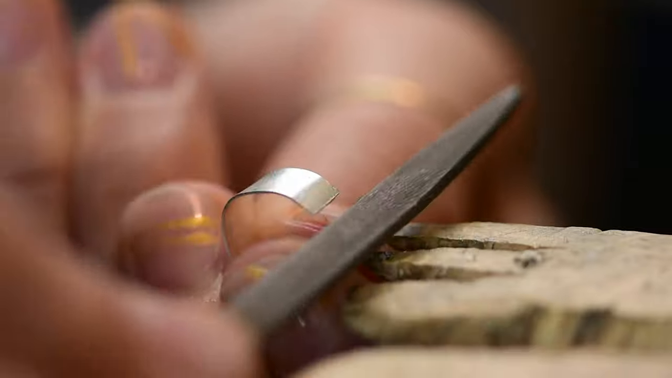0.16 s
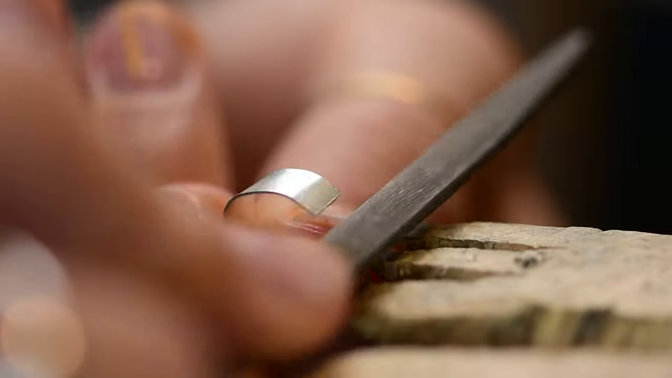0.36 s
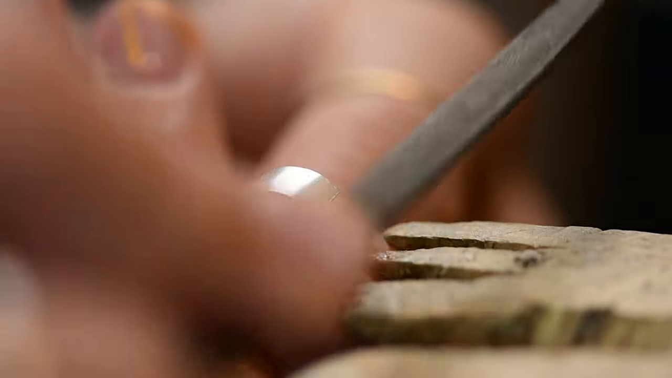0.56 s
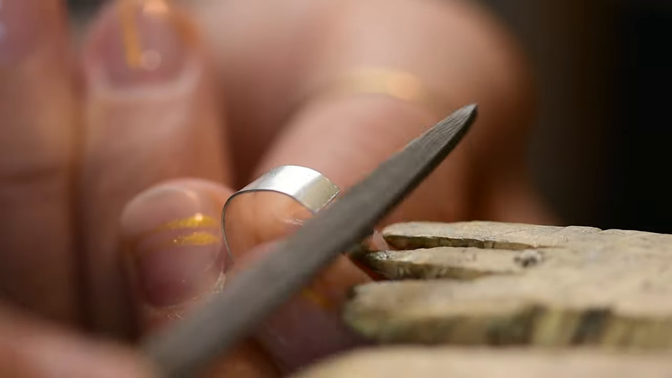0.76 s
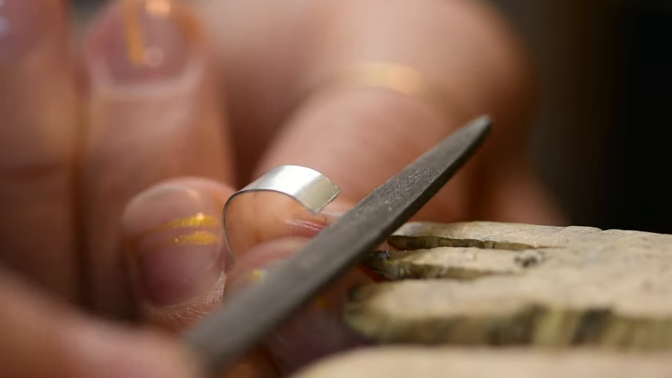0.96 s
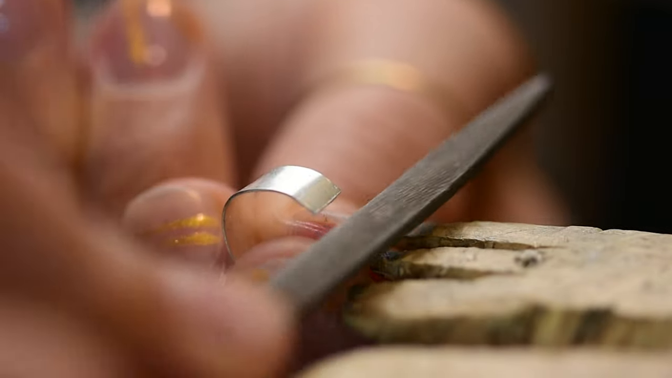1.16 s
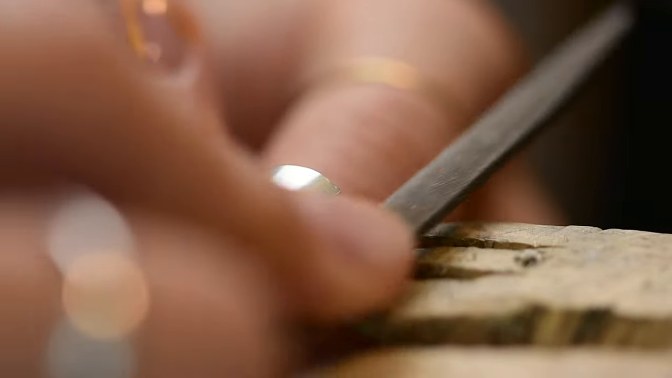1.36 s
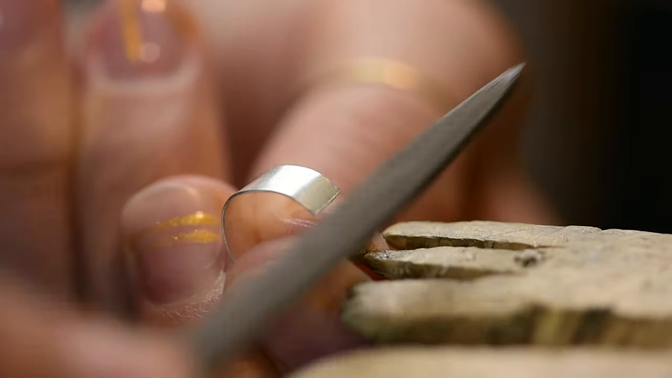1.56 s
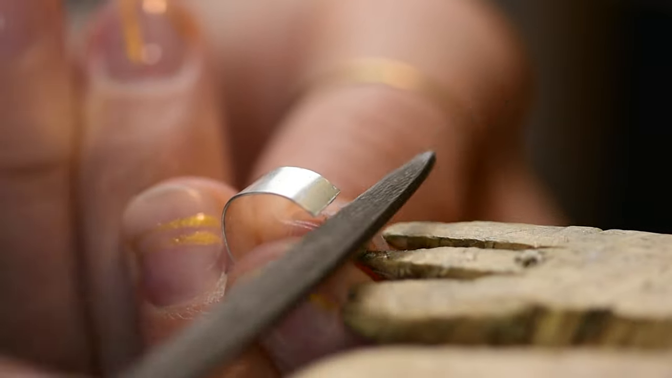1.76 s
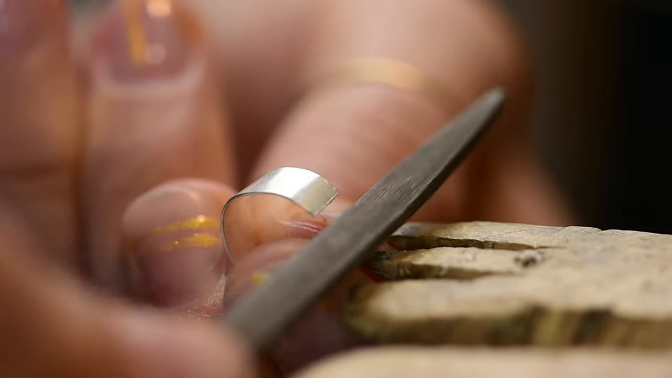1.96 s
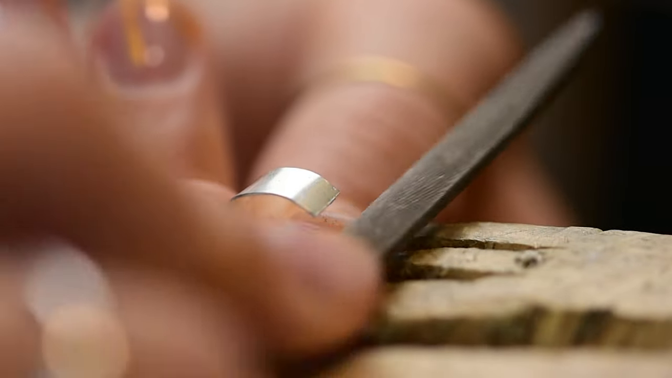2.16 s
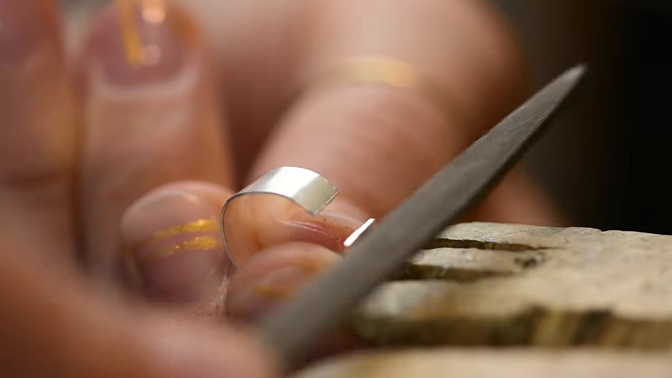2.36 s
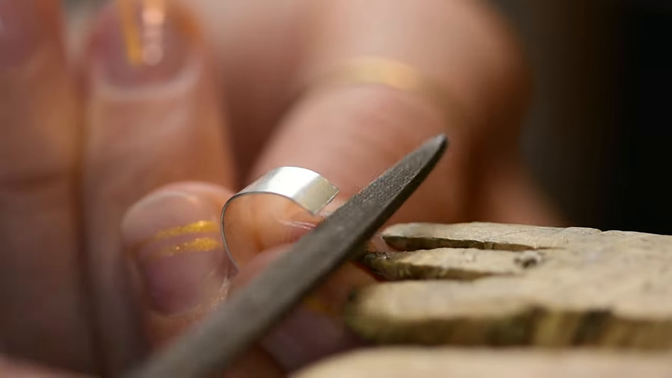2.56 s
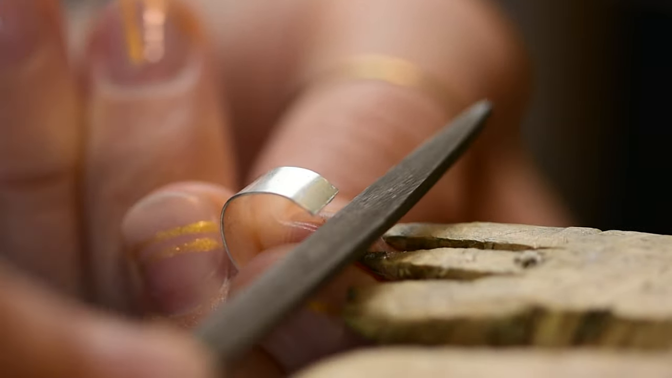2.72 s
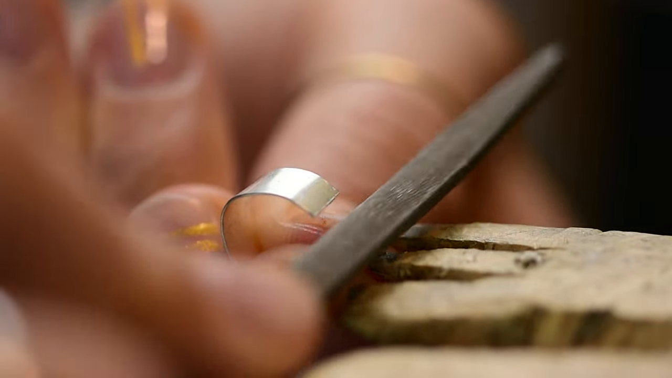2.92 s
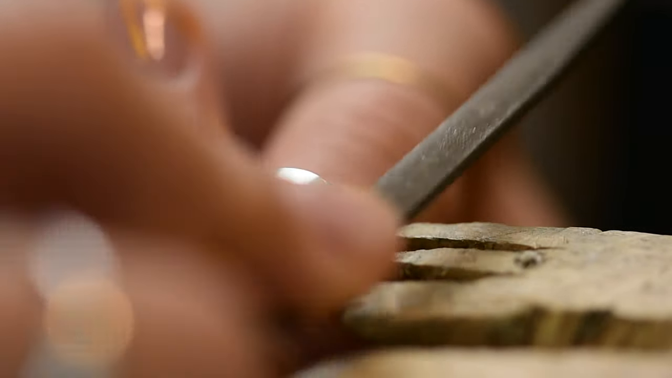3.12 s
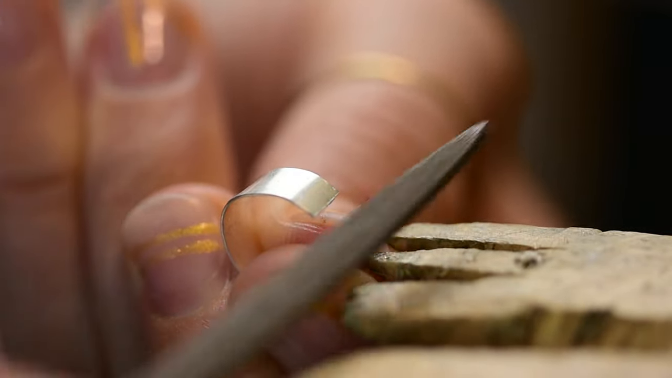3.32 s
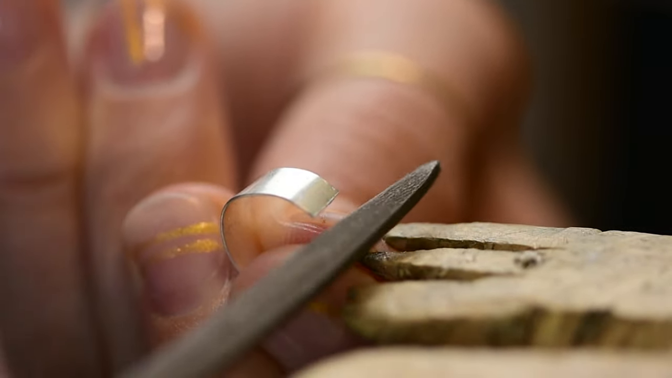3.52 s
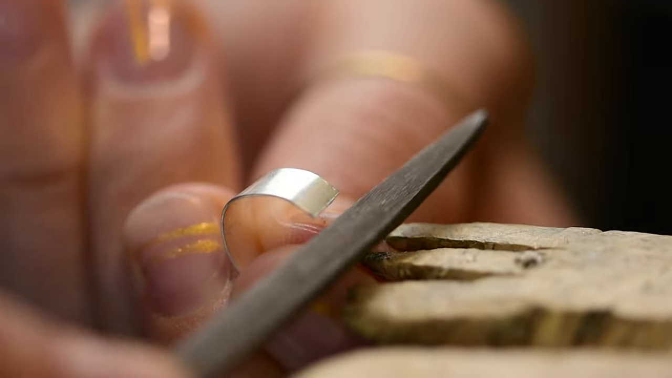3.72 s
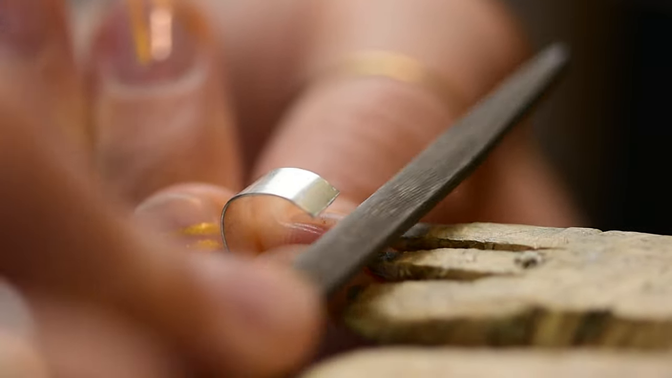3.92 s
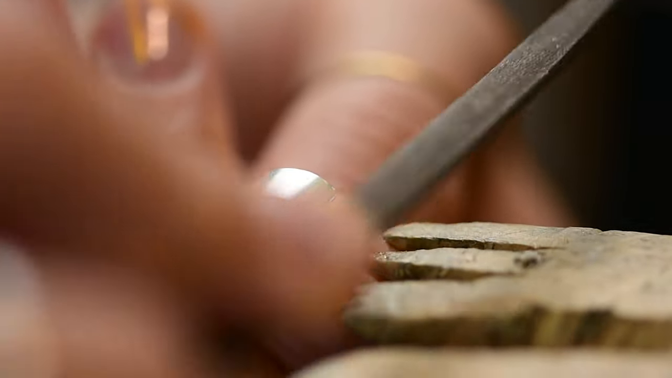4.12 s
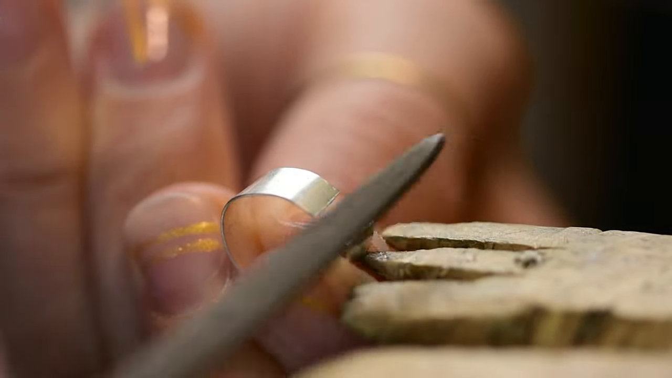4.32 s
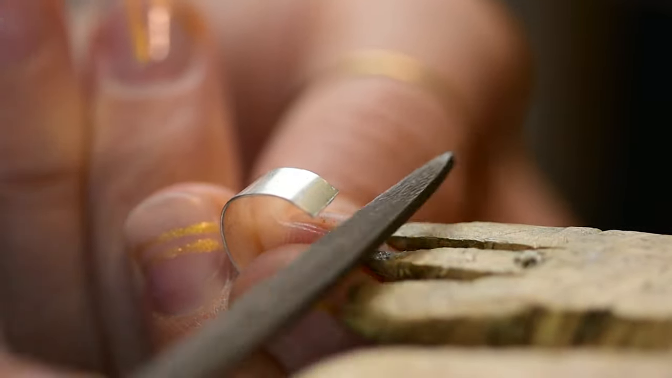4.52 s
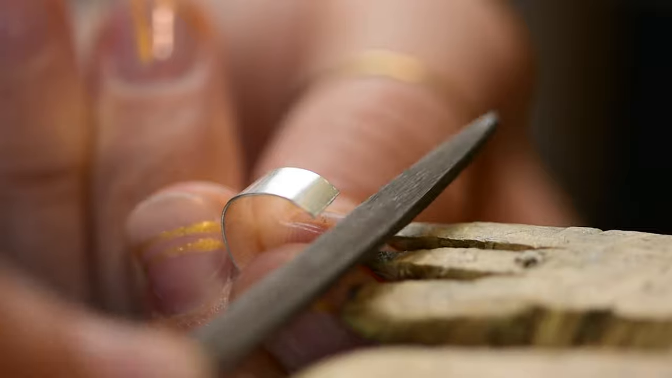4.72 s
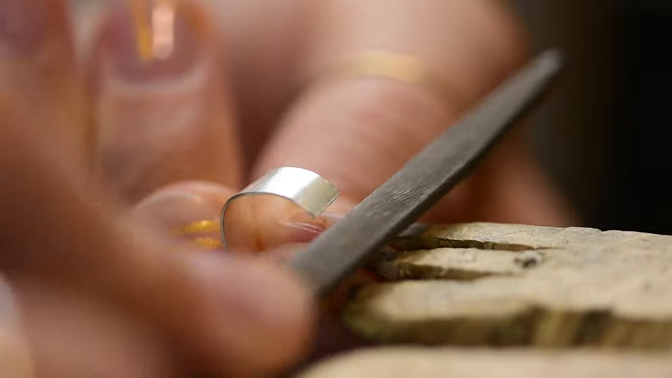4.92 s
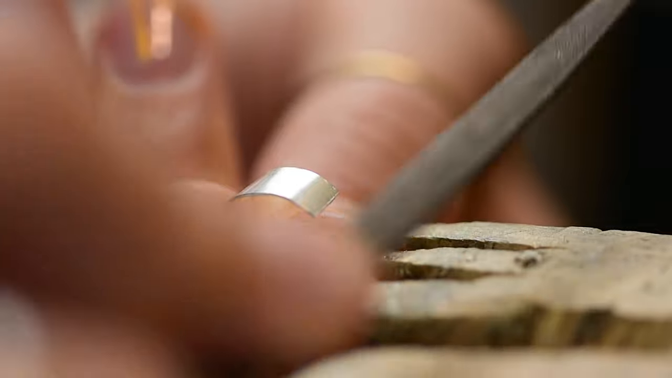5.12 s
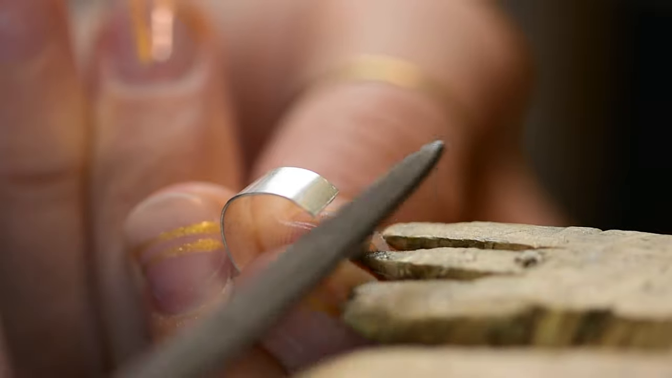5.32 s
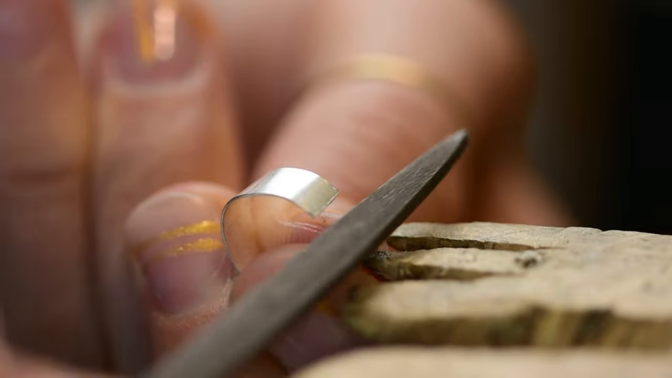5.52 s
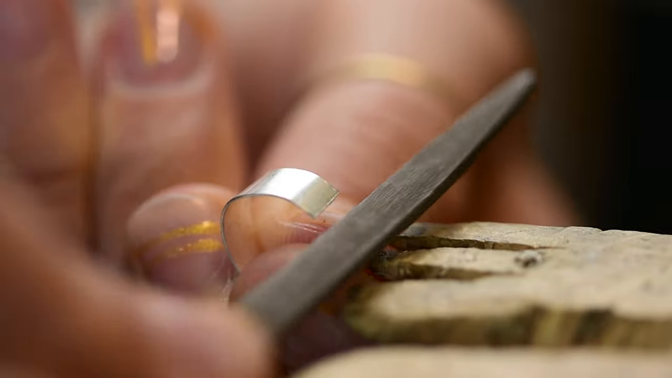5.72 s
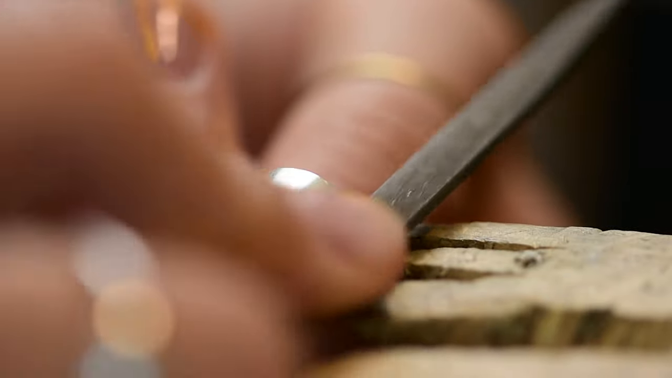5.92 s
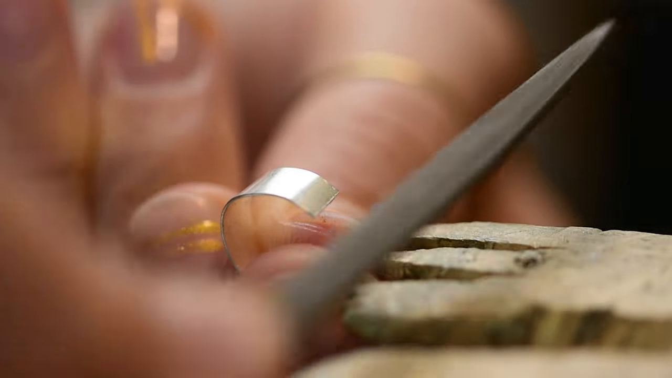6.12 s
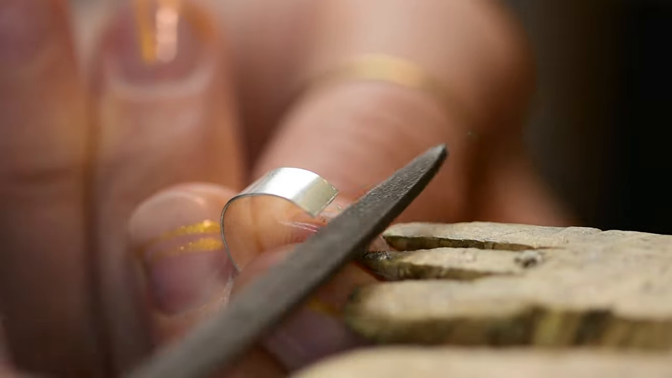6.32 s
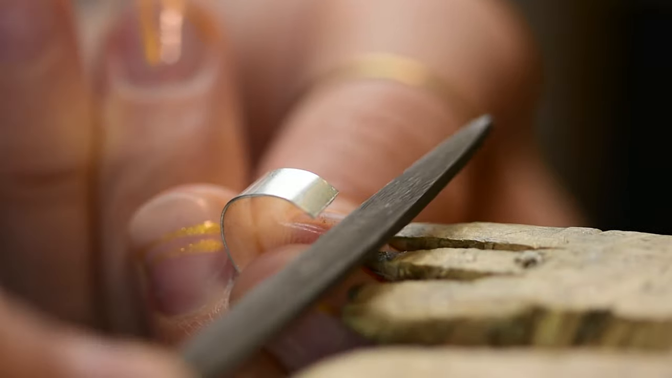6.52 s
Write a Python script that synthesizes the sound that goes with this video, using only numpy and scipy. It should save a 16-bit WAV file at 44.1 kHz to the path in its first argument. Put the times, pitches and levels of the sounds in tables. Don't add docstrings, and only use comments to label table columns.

```python
import sys
import numpy as np
from scipy import signal
from scipy.fft import rfft, irfft, next_fast_len
from scipy.io import wavfile
from scipy.ndimage import uniform_filter1d, map_coordinates

SR = 44100
rng = np.random.default_rng(int(sys.argv[2]) if len(sys.argv) > 2 else 0)


def pcm_store(signal):
    levels = np.round(np.clip(np.atleast_2d(signal), -1, 1) * 32767)
    wavfile.write(sys.argv[1], SR, levels.astype(np.int16).T)


def ratio_of_db(decibels):
    return 10 ** (np.asarray(decibels, float) / 20)


N = 294588
T = np.arange(N) / SR

# frequency in Hz, density in dB per Hz.
RUMBLE_SPECTRUM = [(12, -57), (20, -3), (65, 11), (90, -3), (120, -66), (200, -120)]
BUMP_SPECTRUM = [(12, -12), (27, 0), (45, -14), (80, -40), (150, -120)]
# frequency in Hz, density in dB per Hz.
AIR_SPECTRUM = [(53, -13), (90, -2.5), (117, -2.5), (153, -10.5), (390, -14), (539, -24.5), (662, -19.5),
                (3000, -38), (3900, -74), (6600, -120)]
HISS_SPECTRUM = [(1500, -32), (2500, -10.5), (4500, -3.5), (4700, 0.5), (8900, -8.5), (9100, 0.5),
                 (13000, -6), (13200, -1), (15800, -3)]
# frequency in Hz, level in dB.
WHINE_LINES = [(4877, -93), (5626, -94), (6751, -93), (7127, -90), (9372, -96), (13501, -94), (13878, -92),
               (14250, -86), (14626, -92)]
# frequency in Hz, decay by 60 dB in seconds.
ROOM_DECAY = [(200, 0.39), (1000, 0.34), (4000, 0.17), (14000, 0.14)]
# frequency in Hz, width in Hz.
WORK_DIPS = [(1620, 110), (3920, 160), (4800, 200), (6800, 110)]

ROCK_HZ = [170, 208, 285, 308, 533]
PIN_HZ = [342, 371, 398, 430]
BENCH_HZ = [590, 666, 700, 764, 831, 887, 984, 1048]
FILE_HZ = [1260, 1390, 1517, 1770, 1830, 1965, 2185, 2600, 2810, 3120, 3375, 3620, 4200, 4500, 5300, 5600,
           5980, 6478, 6940, 7300, 7770, 8510]
# width in Hz, level in dB.
ROCK_SHAPES = [(40, -21), (20, -7), (22, -3), (14, 3), (20, -7)]
PIN_SHAPES = [(22, -9), (16, 0), (22, -5), (28, -11)]
BENCH_SHAPES = [(50, -3), (46, 6.5), (38.3, 7.5), (28, 7.5), (29.5, 2), (23.5, 4), (33.6, 2), (44, -1)]
FILE_SHAPES = [(254, -3.5), (60.5, 3), (66, 1), (64, 2), (46, -11.5), (77, -1.5), (54, -3), (157, -6.5),
               (88, -5.5), (101, -2.5), (93, -16.5), (97, -5.5), (212, -7), (141, -5.5), (480, -11.5),
               (198, -11), (160, -11), (169, -17.5), (151, -10.5), (120, -15), (141, -12.5), (260, -27.5)]
# frequency in Hz, width in Hz, level in dB.
TIP_MODES = [(1830, 80, 0), (6478, 160, -4), (3375, 100, -5), (8510, 140, -13)]
CHIP_MODES = [(9370, 260, -3), (10660, 770, -2), (12100, 1260, -1.5), (12920, 1360, 2), (14200, 1500, -8),
              (16150, 320, 1)]

# start in seconds, level in dB.
TICKS = [(.5135, -30), (.8834, -44), (2.252, -42), (4.4825, -28), (4.584, -50)]
# start in seconds, peak in dB, bench knock in dB over the peak,
# low clank in dB over the peak.
TAPS = [(0.0164, -49.5, 11, -1), (0.884, -24, -2, 14), (2.6114, -68, 18, -7), (3.5159, -43, 3.5, 10),
        (4.4839, -30.5, -5.5, -30), (4.5831, -33, -33, -14), (5.5004, -49, 2, -10), (6.3879, -47, 2, 12)]
# time in seconds, bite in dB.
BITE = [
    [(0.02, -56.5), (0.102, -52.5), (0.17, -56), (0.366, -44), (0.392, -51), (0.418, -43.5), (0.519, -51.5)],
    [(0.93, -62.5), (0.97, -76), (0.98, -62), (1.206, -44), (1.212, -48.5), (1.374, -39.5), (1.418, -48.5)],
    [(1.77, -72.5), (1.89, -49), (1.954, -53), (1.964, -35), (1.972, -45), (2.202, -41), (2.26, -52)],
    [(2.6, -90.5), (2.708, -54), (2.714, -54.5), (2.85, -47), (2.862, -54), (3.082, -39), (3.119, -51.5)],
    [(3.55, -74.5), (3.63, -56.5), (3.742, -59), (3.79, -44), (3.81, -47.5), (4.066, -44), (4.11, -60)],
    [(4.53, -63.5), (4.578, -74), (4.584, -58), (4.652, -72), (4.722, -52.5), (5.062, -40.5),
     (5.092, -53.5)],
    [(5.49, -80), (5.508, -65.5), (5.672, -47.5), (5.85, -42), (5.88, -39), (6.002, -43), (6.01, -48)],
    [(6.42, -70), (6.464, -66), (6.488, -57), (6.514, -61.5), (6.598, -46), (6.604, -51), (6.68, -45.5)],
]
# time in seconds, weight in dB.
WEIGHT = [
    [(0.02, -54), (0.35, -36.5), (0.412, -42), (0.434, -34.5), (0.512, -35.5), (0.519, -46.5)],
    [(0.93, -52.5), (1.038, -41), (1.25, -39), (1.306, -28.5), (1.392, -34.5), (1.418, -48)],
    [(1.77, -60), (1.836, -48), (1.978, -38.5), (2.144, -35.5), (2.214, -32), (2.26, -44)],
    [(2.6, -87), (2.616, -65), (2.802, -43), (2.956, -38), (3.002, -33), (3.119, -37.5)],
    [(3.55, -56.5), (3.808, -40.5), (3.874, -46), (3.926, -31), (4.066, -38), (4.11, -42.5)],
    [(4.53, -52.5), (4.656, -52), (4.702, -45), (4.822, -35), (5.062, -35.5), (5.092, -43)],
    [(5.49, -90), (5.518, -54.5), (5.758, -31), (5.782, -40), (5.916, -26.5), (6.01, -32)],
    [(6.42, -59), (6.466, -49), (6.486, -46.5), (6.57, -43), (6.586, -37), (6.68, -34.5)],
]
# time in seconds, lean of the hand just before in dB.
LIFTS = [(0.517, 5), (1.418, 9.5), (2.262, 6), (3.117, -2.5), (4.11, 5.5), (5.092, 3), (6.008, -7),
         (6.9, -1)]
# middle in seconds, half length in seconds, bite in dB.
GRAZES = [(1.64, 0.24, -60.5), (2.425, 0.22, -59.5), (4.3, 0.022, -66)]
# time in seconds, peak in dB.
CATCHES = [(0.0732, -41), (0.2374, -38), (0.411, -33), (0.5132, -32), (0.9767, -47), (1.043, -42),
           (1.0819, -38), (1.1318, -35), (1.1974, -36), (1.2814, -32), (1.8911, -37), (1.9634, -26),
           (2.0333, -31), (2.0792, -30), (2.2503, -34), (2.7132, -40), (2.8429, -39), (2.8953, -37),
           (3.0081, -29), (3.5927, -47), (3.7095, -44), (3.7539, -39), (3.9744, -36), (4.7152, -40),
           (4.8, -37), (4.9751, -35), (5.5294, -49), (5.7194, -35), (5.8975, -27), (6.4757, -45)]

TOUCH_S, LIFT_S, SETTLE_S = 0.03, 0.008, 0.2


def unit(x):
    return x / np.sqrt(np.mean(x ** 2) + 1e-20)


def decay(t, t60):
    return ratio_of_db(-60 * t / t60)


def along(points, hz):
    f, v = np.transpose(points)
    return np.interp(np.log(hz + 1), np.log(f + 1), v)


def wobble(rate):
    knots = rng.standard_normal(int(N * rate / SR) + 4)
    return map_coordinates(knots, [T * rate])


def filtered(x, response):
    m = next_fast_len(N + SR // 2)
    return irfft(rfft(x, m) * response(np.fft.rfftfreq(m, 1 / SR)), m)[:N]


def noise(spectrum):
    return unit(filtered(rng.standard_normal(N), lambda hz: ratio_of_db(along(spectrum, hz))))


def rumble():
    start_db, grows_db_per_s, sway_db = -70.5, 0.88, -1.5
    ground = ratio_of_db(start_db + grows_db_per_s * T + sway_db * wobble(4)) * noise(RUMBLE_SPECTRUM)
    bump_s, bump_db, rise_s, fall_s = 1.03, -52, 0.12, 0.2
    bump = ratio_of_db(bump_db - 15 * np.maximum((bump_s - T) / rise_s, (T - bump_s) / fall_s))
    return ground + bump * noise(BUMP_SPECTRUM)


def air(swell_db):
    breath = ratio_of_db(-61.2 + 0.3 * swell_db + 0.88 * wobble(1.76))
    return breath * noise(AIR_SPECTRUM) + ratio_of_db(-71.5) * noise(HISS_SPECTRUM)


def hum(swell_db):
    level_db, wander_rad = -58.7, 1.25 * 0.13
    phase = 2 * np.pi * 100 * T + wander_rad * wobble(13)
    return ratio_of_db(level_db + swell_db + 1.34 * wobble(6)) * np.sin(phase)


def whine():
    return sum(ratio_of_db(db + 3) * np.sin(2 * np.pi * hz * T) for hz, db in WHINE_LINES)


def background():
    middle_s, peak_db, half_width_s = 6, 4.5, 0.7
    swell_db = peak_db * np.exp(-((T - middle_s) / half_width_s) ** 2)
    return rumble() + air(swell_db) + hum(swell_db) + whine()


def room(x):
    hz, t, z = signal.stft(rng.standard_normal(SR // 2), SR, nperseg=256)
    t60 = along(ROOM_DECAY, hz)[:, None]
    tail = signal.istft(z * decay(t, t60), SR, nperseg=256)[1]
    return signal.fftconvolve(np.pad(x, (200, 0)), tail / np.linalg.norm(tail))[:N]


def dipped(f):
    dips = [(c * c - f * f + 0.2j * f * w) / (c * c - f * f + 1j * f * w) for c, w in WORK_DIPS]
    return np.prod(dips, axis=0)


def body(modes, sign=-1):
    def shape(f):
        return sum(sign ** k * ratio_of_db(db) * 1j * f * w / (c * c - f * f + 1j * f * w)
                   for k, (c, w, db) in enumerate(modes))

    norm = np.sqrt(np.mean(np.abs(shape(np.linspace(0, SR / 2, num=8192))) ** 2))
    return lambda f: shape(f) / norm


def modes(hz, shapes, sign=-1):
    return body(np.column_stack([hz, shapes]), sign)


def ticks():
    t = np.arange(SR // 10) / SR
    edge = np.zeros(N + SR)
    for s, db in TICKS:
        burst = (decay(t, 0.004) + 0.015 * decay(t, 0.1)) * rng.standard_normal(len(t))
        edge[round(s * SR):][:len(t)] += ratio_of_db(db + 5) * (burst + 2 * (t == 0))
    bright = body([(13300, 7000, 0)])
    return filtered(edge[:N], lambda f: bright(f) ** 2 / 2)


def taps():
    t = np.arange(SR // 8) / SR
    knock, clank, ring = np.zeros((3, N + SR))
    for s, db, knock_db, clank_db in TAPS:
        at = slice(round(s * SR), round(s * SR) + len(t))
        rattle = rng.standard_normal((3, len(t)))
        thump = 4 * decay(t, 0.0007) + (0.5 * decay(t, 0.03) + 0.3 * decay(t, 0.33)) * rattle[0]
        knock[at] += ratio_of_db(db + knock_db + 4) * thump
        clank[at] += ratio_of_db(db + clank_db - 19.5) * (5 * (t == 0) + 0.71 * decay(t, 0.051) * rattle[1])
        ring[at] += ratio_of_db(db - 12) * (6 * (t == 0) + (decay(t, 0.018) + 0.23 * decay(t, 0.18)) * rattle[2])
    soft = filtered(knock[:N], body([(830, 380, 0)])) / 8
    wood = filtered(soft, modes(BENCH_HZ, BENCH_SHAPES, 0.61))
    wood += 0.15 * filtered(soft, modes(PIN_HZ, PIN_SHAPES))
    low_steel = filtered(clank[:N], modes(FILE_HZ[:7], FILE_SHAPES[:7]))
    return wood + low_steel + filtered(ring[:N], modes(FILE_HZ, FILE_SHAPES))


def effort(strokes):
    off_db = -120
    rows = []
    for stroke in strokes:
        start_s = stroke[0][0] - TOUCH_S
        end_s, end_db = stroke[-1][0] + SETTLE_S, stroke[-1][1]
        rows.append([(start_s, off_db), *stroke, (end_s, end_db), (end_s + LIFT_S, off_db)])
    return np.interp(T, *np.vstack(rows).T)


def contact(drop_db, fade_db):
    after_s = [0, LIFT_S, SETTLE_S, SETTLE_S + 2 * LIFT_S, SETTLE_S + 3 * LIFT_S]
    fall_db = [0, drop_db, drop_db + fade_db, drop_db + fade_db, 0]
    return sum(np.interp(T - s, after_s, fall_db) for s, _ in LIFTS)


def lean():
    around_s = [-0.29, 0.0076, -0.098, 0.22]
    return sum(lean_db * np.interp(T - s, around_s, [0, 1, 1, 0]) for s, lean_db in LIFTS)


def level(full_db, by_bite, by_weight, early_db, stop):
    lifts = np.array(LIFTS)[:, 0]
    to_lift = T - lifts[np.searchsorted(lifts + SETTLE_S, T)]
    early = np.interp(to_lift, (-0.37, -0.22), [1, 0])
    full_bite_db, full_weight_db = -45, -37
    db = by_bite * (effort(BITE) - full_bite_db) + by_weight * (effort(WEIGHT) - full_weight_db)
    return ratio_of_db(full_db + db + early_db * early + contact(*stop))


def bites(rate, spread_db, grind):
    hit = rng.random(N) < rate / SR
    size = ratio_of_db(spread_db * np.minimum(rng.exponential(size=N), 3)) * rng.standard_normal(N)
    return unit(unit(hit * size) + grind * rng.standard_normal(N))


def catching(life_s):
    snap = np.zeros(N)
    s, db = np.transpose(CATCHES)
    at = (s * SR).astype(int)
    snap[at] = np.minimum(ratio_of_db(db - effort(BITE)[at] - 14), 2.2)

    def fall(x):
        return signal.lfilter([1], [1, -np.exp(-1 / (life_s * SR))], x)

    stick = np.roll(fall(snap[::-1])[::-1], -1)
    return stick, snap, fall(snap)


def travelling(x, patchy_db):
    z = signal.stft(x, nperseg=256)[2]
    field = uniform_filter1d(rng.standard_normal(z.shape), size=4, axis=0)
    field = uniform_filter1d(field, size=24, axis=1)
    return signal.istft(z * ratio_of_db(patchy_db * unit(field)), nperseg=256)[1][:N]


def filing():
    # drop as the file lifts in dB, further fade while settling in dB
    pin_stop, wood_stop, steel_stop = (-3.5, -58.5), (-1.5, -49), (-7.5, -34)
    force = bites(rate=4500, spread_db=2.5, grind=0.67) * ratio_of_db(0.17 * wobble(30) + 2.1 * wobble(160))
    stick, snap, tear = catching(life_s=0.006)
    force = force / (1 + 1.2 * stick)
    rasp = unit(force)
    graze = sum(ratio_of_db(db - 20 * np.abs(T - s) / half_s) for s, half_s, db in GRAZES)

    rock = level(-41, by_bite=-0.05, by_weight=0.88, early_db=-4.5, stop=pin_stop)
    pin = filtered(rock * ratio_of_db(lean()) * rasp, modes(ROCK_HZ, ROCK_SHAPES))
    thrum = level(-33.5, by_bite=0.14, by_weight=1.02, early_db=2.3, stop=pin_stop)
    pin += filtered(thrum * unit(force * (1 + 1.9 * tear)), modes(PIN_HZ, PIN_SHAPES))

    knock = level(-39, by_bite=0.88, by_weight=-0.04, early_db=0.4, stop=wood_stop) + 0.79 * graze
    bench_force = unit(force * (1 + 0.15 * tear)) + 12 * snap
    bench = filtered(knock * bench_force, modes(BENCH_HZ, BENCH_SHAPES))

    ring = level(-40, by_bite=0.9464, by_weight=0.27, early_db=1, stop=steel_stop) + graze
    steel_force = rasp * (0.77 + 0.51 * tear) + 14 * snap
    steel = filtered(ring * steel_force, modes(FILE_HZ, FILE_SHAPES))
    tip = level(-49, by_bite=0.9, by_weight=0.01, early_db=8, stop=steel_stop)
    steel += filtered(tip * rasp, body(TIP_MODES))

    fizz = level(-54, by_bite=0.87, by_weight=0.14, early_db=-7, stop=steel_stop)
    chips = filtered(fizz * rasp * (1.19 + 1.8 * tear), body(CHIP_MODES))
    return pin + travelling(bench, 0.5) + travelling(steel, 1.5) + travelling(chips, 0.4)


def scene():
    work = filtered(filing() + taps(), dipped)
    edge = ticks()
    direct = ratio_of_db(-6.0) * (work + edge)
    reverberation = ratio_of_db(-15.5) * room(work + 0.57 * edge)
    return (direct + reverberation + background())[None]


def top_cut(x):
    return signal.sosfilt(signal.butter(12, 16810, fs=SR, output="sos"), x)


def record(dry):
    top_hz = 15830
    mix = filtered(dry[0], lambda hz: hz < top_hz)[None]
    return top_cut(mix)


dry = scene()
out = record(dry)
pcm_store(out)
```